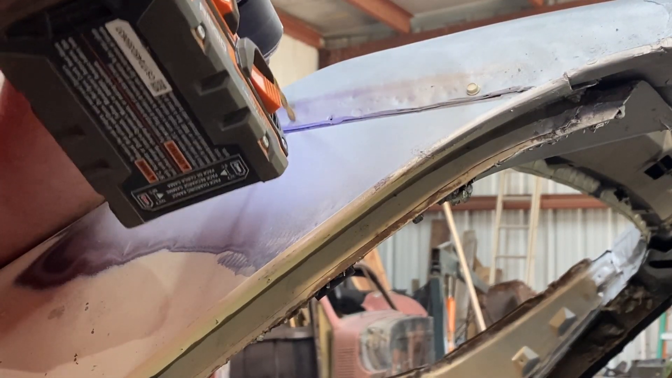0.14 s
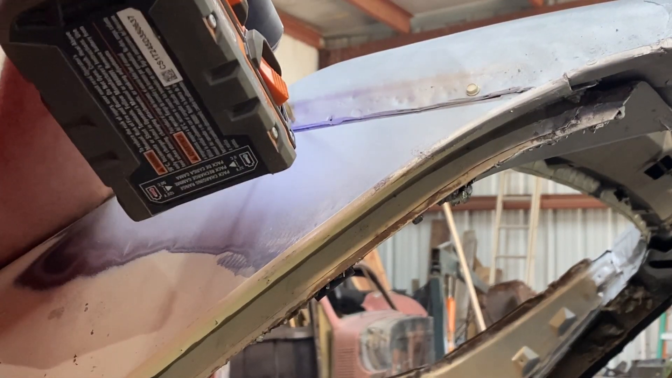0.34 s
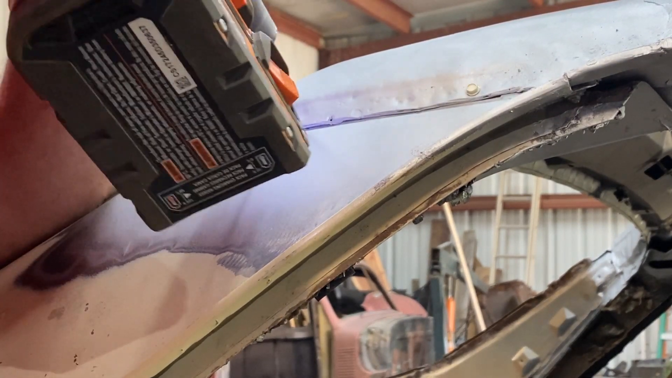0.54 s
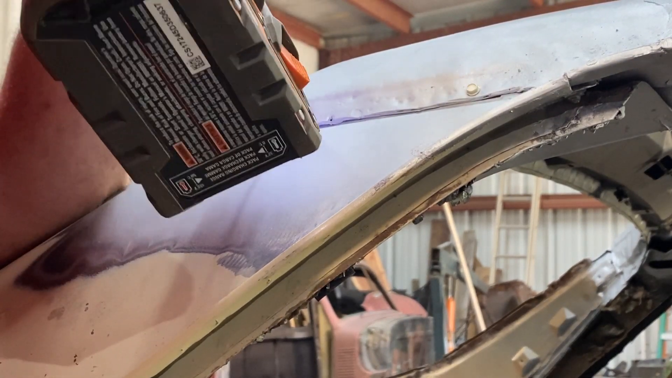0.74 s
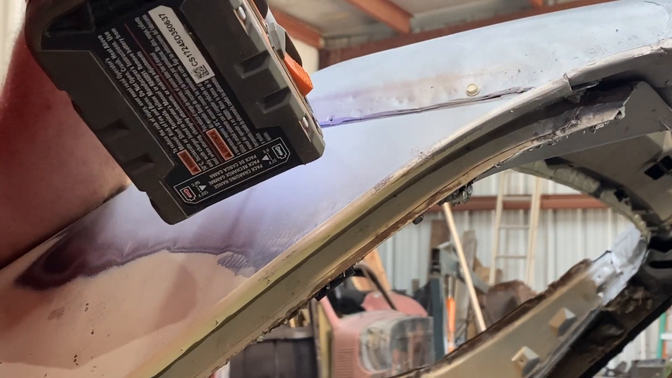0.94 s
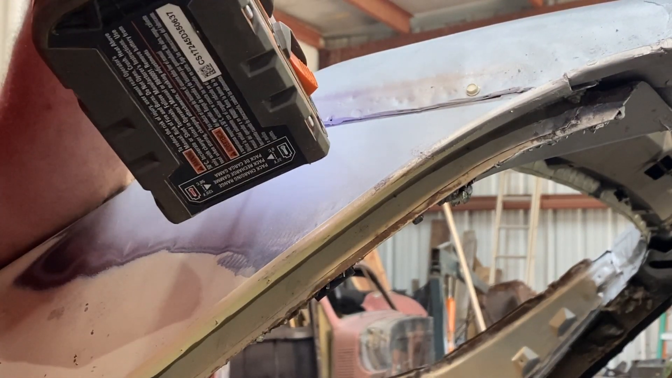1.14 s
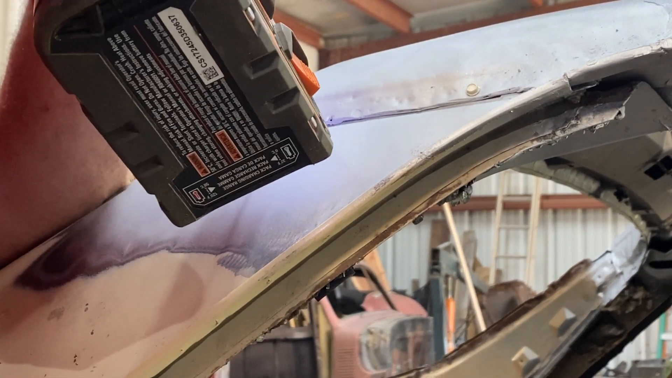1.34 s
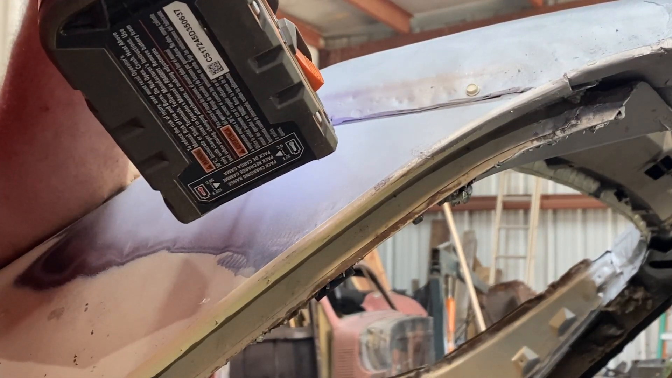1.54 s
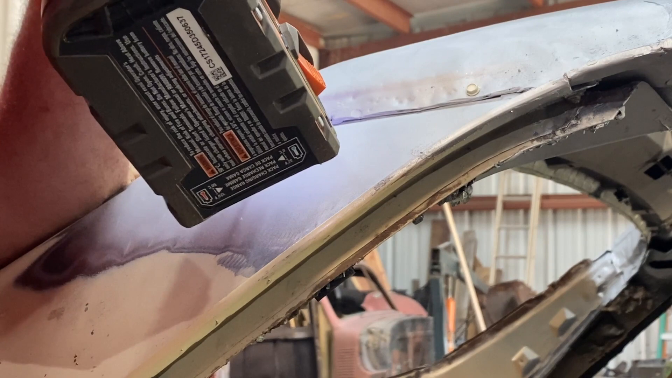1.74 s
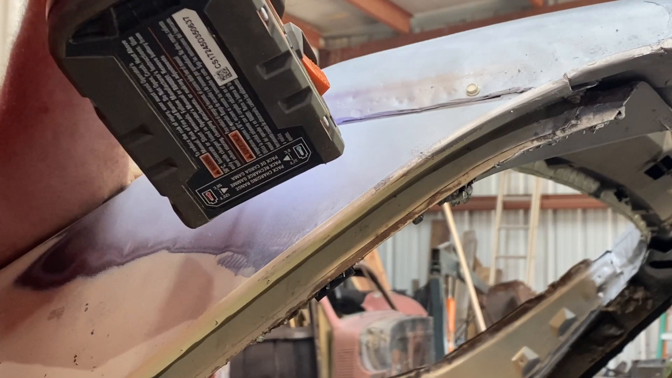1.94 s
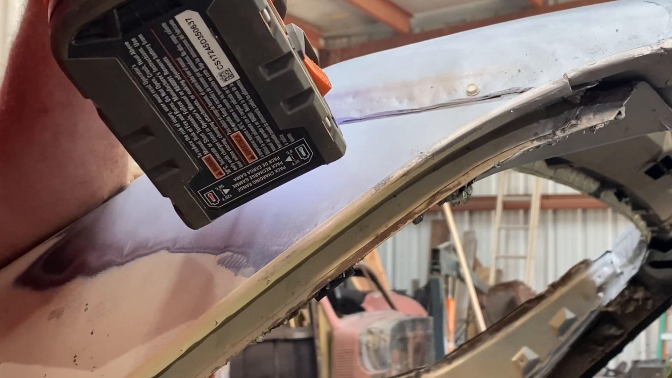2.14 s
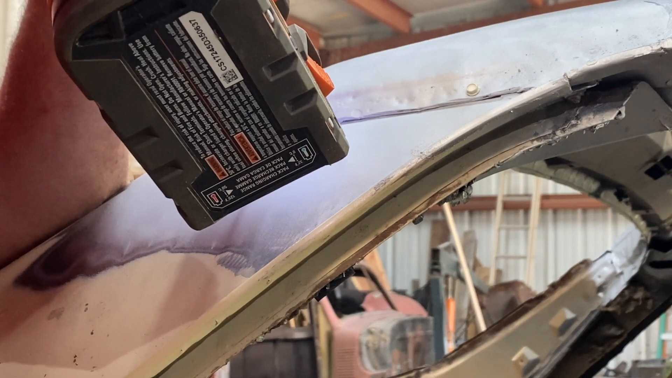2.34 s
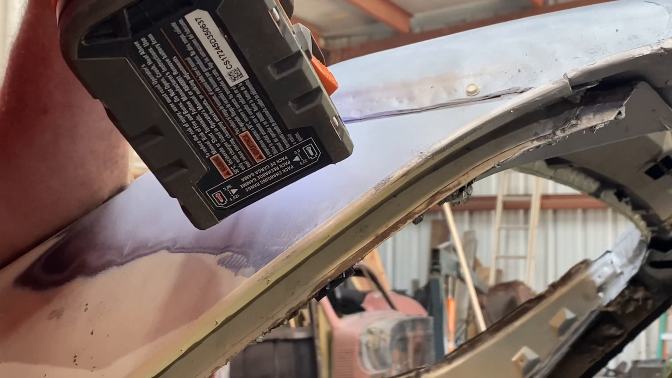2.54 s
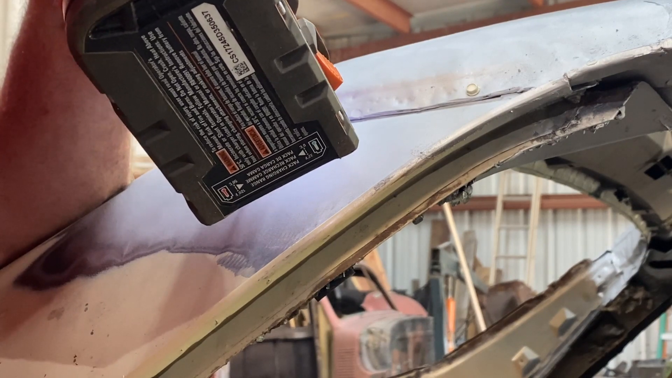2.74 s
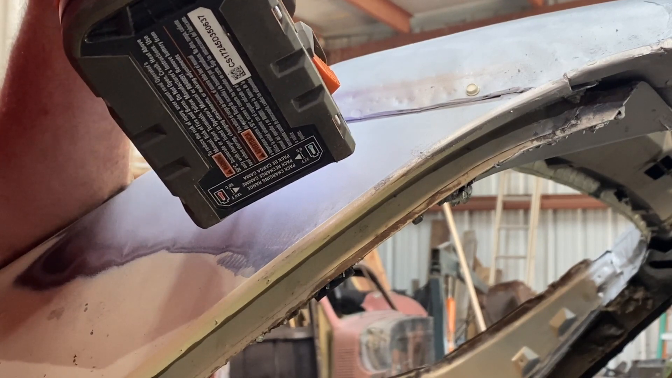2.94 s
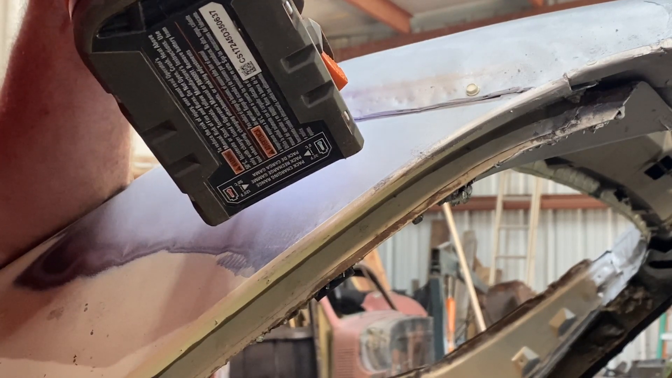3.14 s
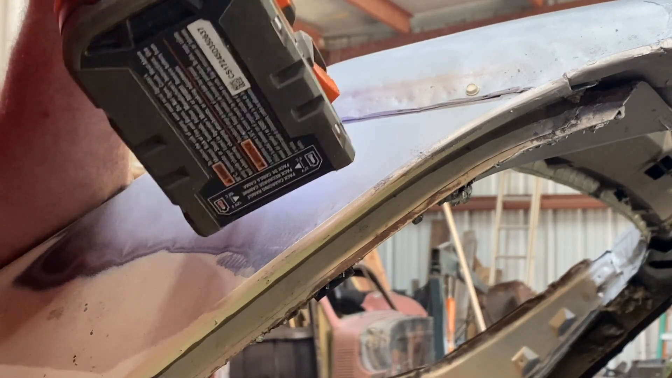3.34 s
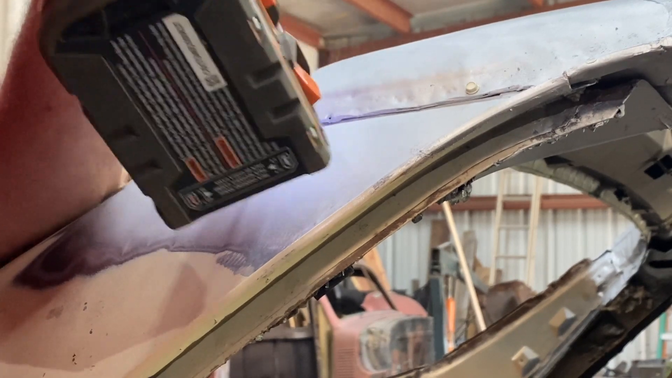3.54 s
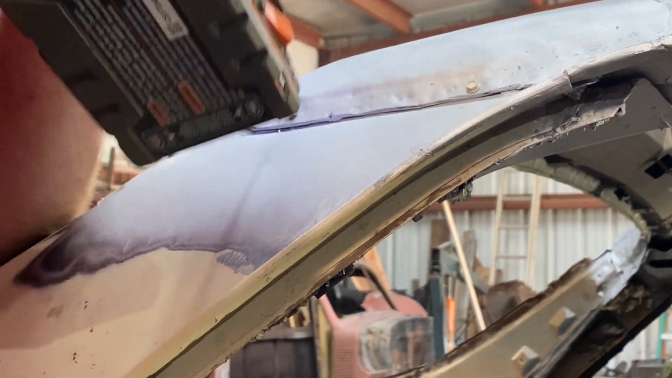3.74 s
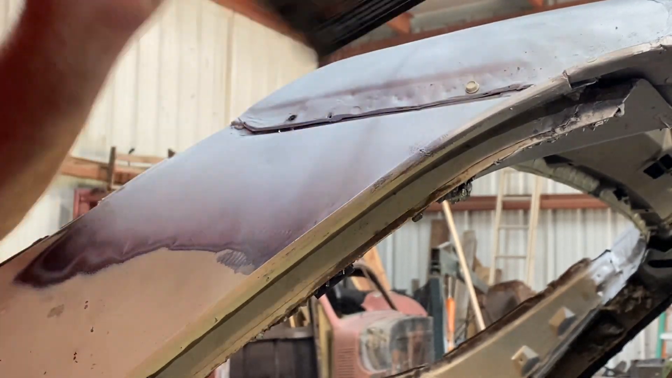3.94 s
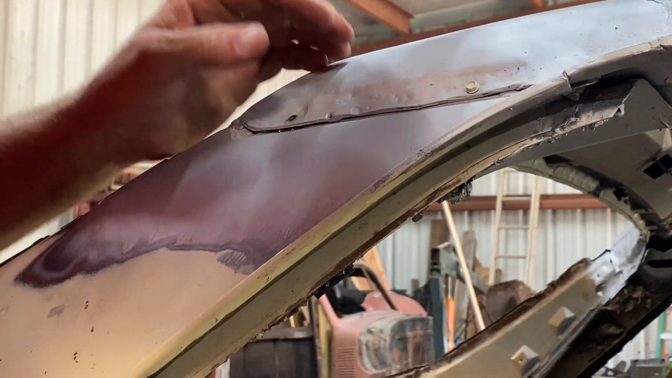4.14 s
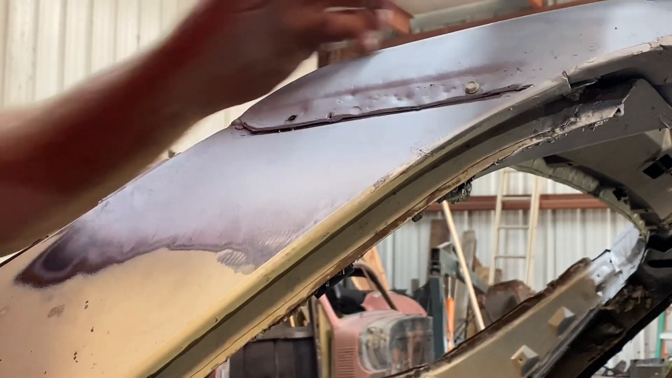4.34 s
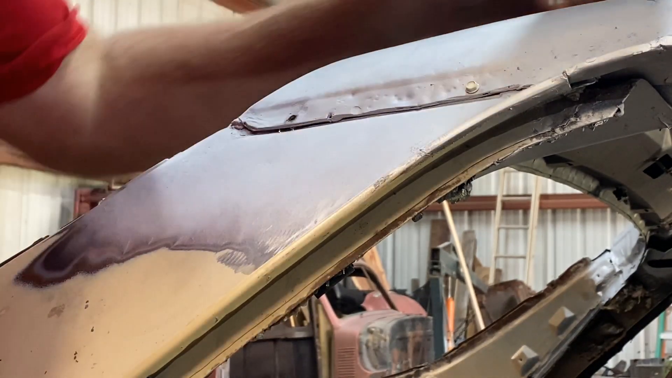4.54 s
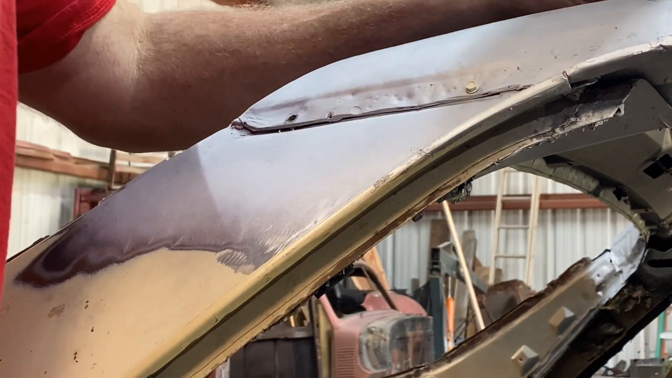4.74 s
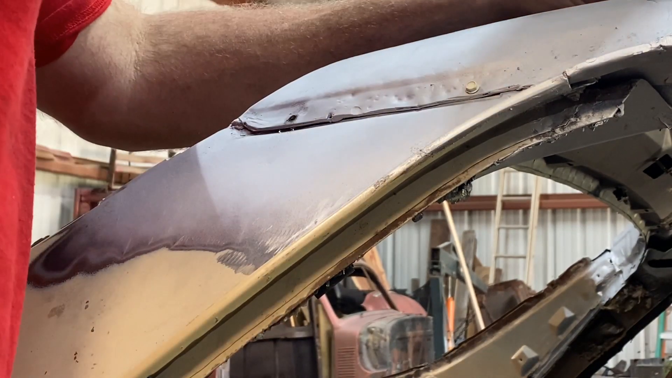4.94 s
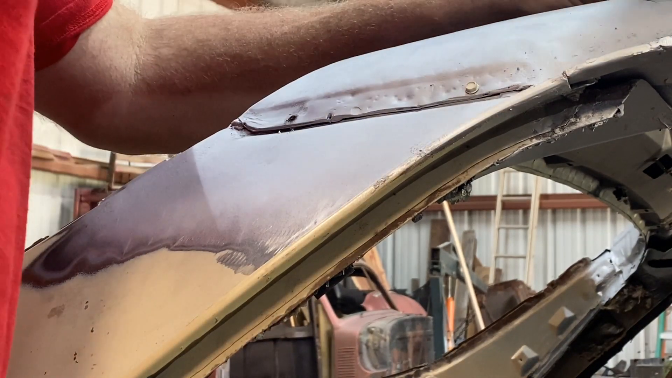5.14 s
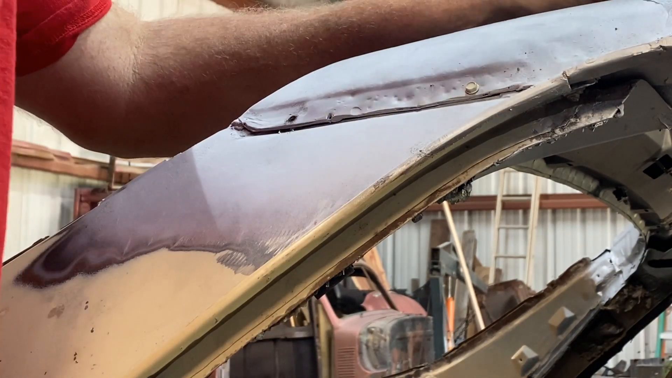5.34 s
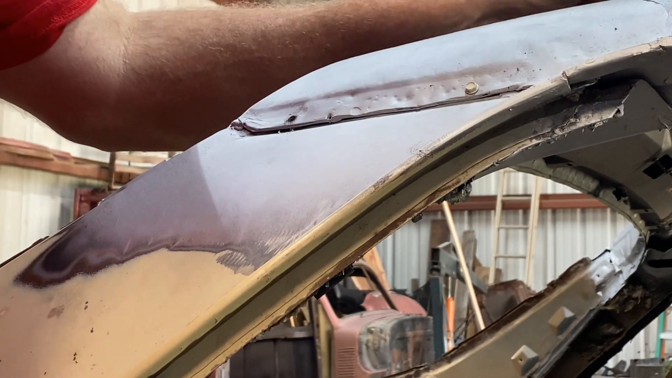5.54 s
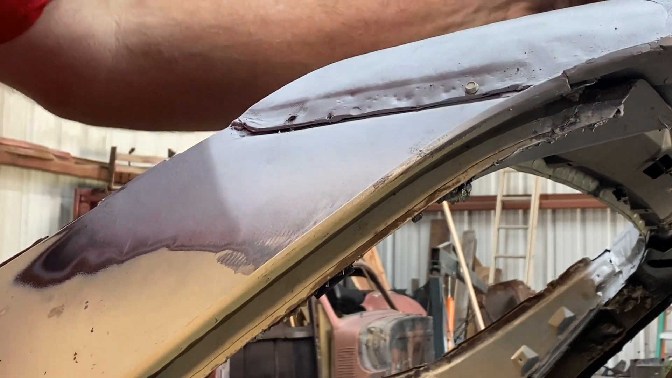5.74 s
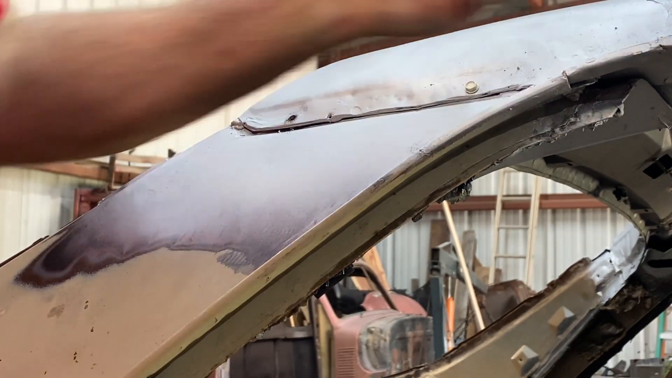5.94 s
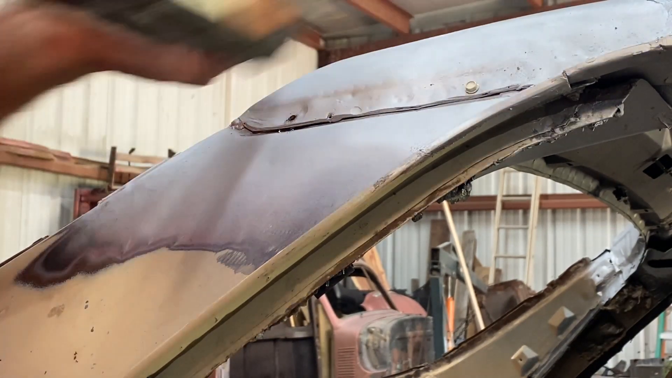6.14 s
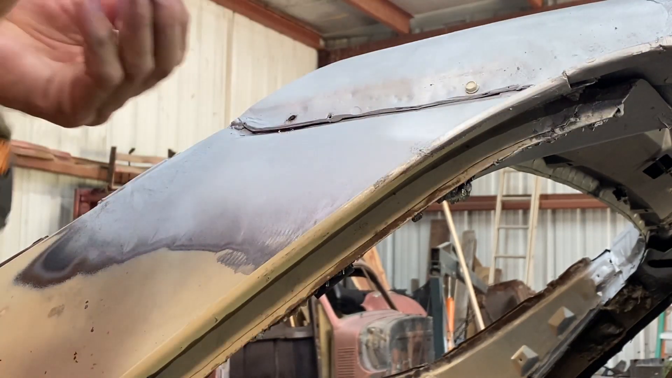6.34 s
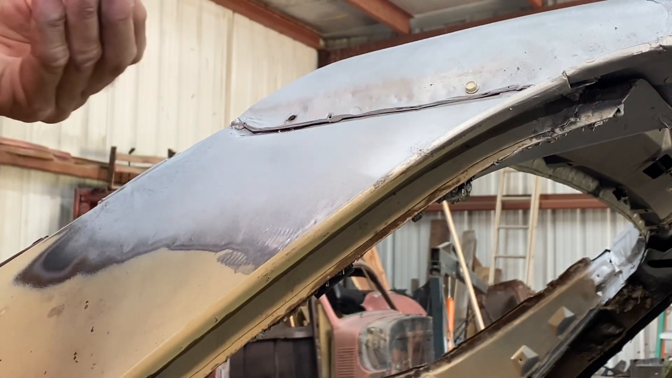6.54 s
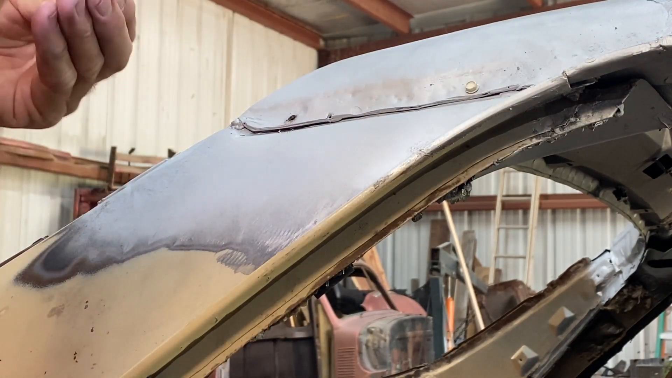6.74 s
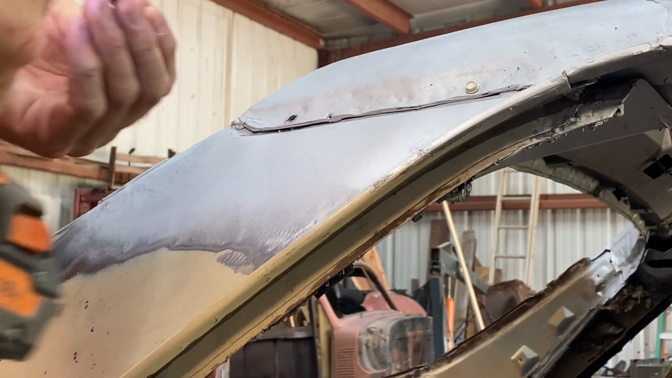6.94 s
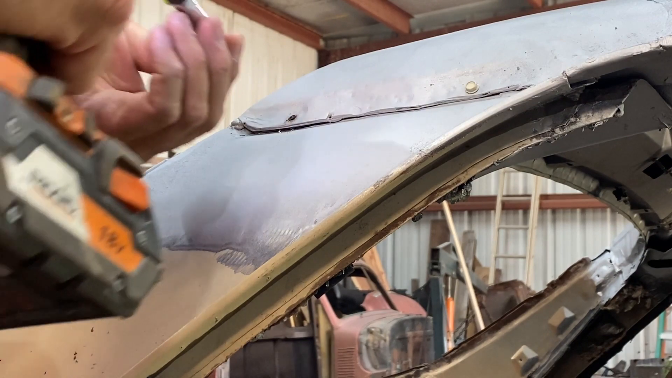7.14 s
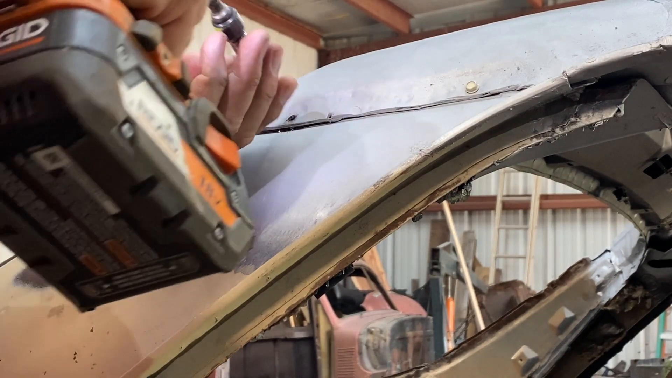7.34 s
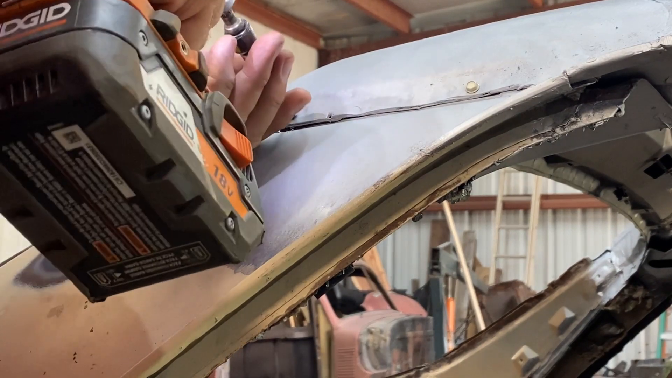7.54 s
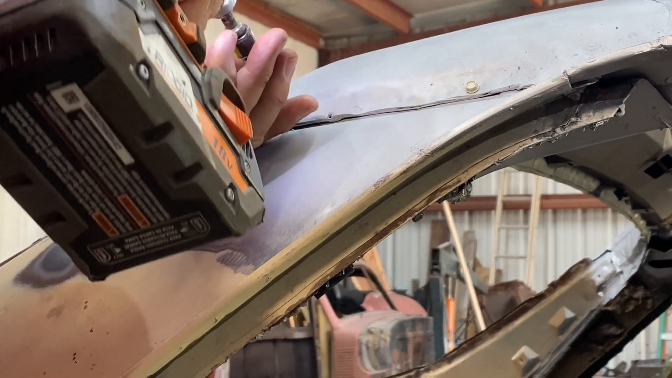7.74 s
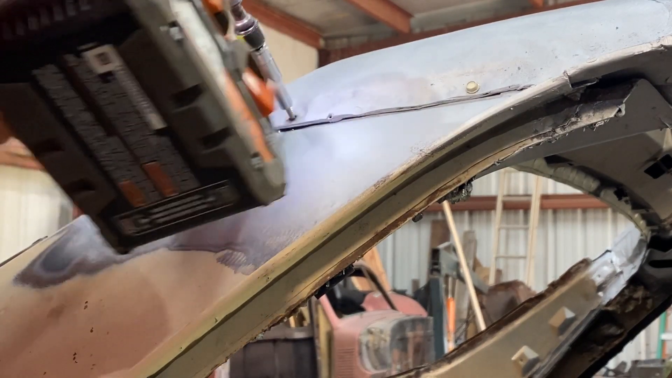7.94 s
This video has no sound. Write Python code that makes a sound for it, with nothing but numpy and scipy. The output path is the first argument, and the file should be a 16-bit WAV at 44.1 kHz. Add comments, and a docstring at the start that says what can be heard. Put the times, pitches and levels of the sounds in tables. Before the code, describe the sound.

Close, shrill drill whine sags under load and chirps to a stop; thin metal then clatters and slides, a screw clicks, and final knocks land.

```python
"""A cordless drill bores into a sheet-metal car panel close to the microphone, in a workshop.
Its magnetic whine sags under load over the noise of chips breaking at the bit; braking makes a loud falling chirp.
Then a hand rattles and slides the loose panel, it snaps into place and the drill is set on it again:
each blow rings damped modes of the sheet. A screw clicks, and air noise and machine hum lie behind."""
import sys
import numpy as np
from scipy import signal
from scipy.fft import rfft, irfft, next_fast_len
from scipy.io import wavfile

SR = 44100
rng = np.random.default_rng(int(sys.argv[2]) if len(sys.argv) > 2 else 0)


def to_wav(sig):
    """Store sig (one row per channel, or 1-D mono) as 16-bit WAV at the path in sys.argv[1].

    Samples outside -1..1 are clipped; the rate is SR.
    """
    pcm = np.clip(np.atleast_2d(sig), -1, 1) * 32767
    pcm = np.round(pcm).astype(np.int16)
    wavfile.write(sys.argv[1], SR, pcm.T)  # frames by channels


N = 356328
TIME = np.arange(N) / SR

# The motor, sagging as the hand leans on it. Each row: time in seconds, whine pitch in Hz, level in dB.
MOTOR = [(0.0, 3254, -11), (0.01, 3253, -9.5), (0.45, 3244, -13), (0.5, 3233, -17), (0.71, 3228, -10),
         (1.42, 3198, -11), (1.65, 3183, -16), (2.39, 3180, -17), (2.77, 3133, -16), (3.02, 3160, -18),
         (3.13, 3133, -15), (3.23, 3067, -19), (3.32, 3164, -17), (3.42, 3233, -24), (3.43, 3234, -38.5)]
WHINE_ORDER = 32  # whine cycles per turn of the rotor
# the trigger is released and the motor coasts; then the brake stops it
RELEASE_S, BRAKE_S, HALT_S = 3.44, 3.475, 3.58
BRAKE_HZ = 2982  # whine pitch as braking begins


def amp(db):
    """Amplitude ratio of a level: 20 dB is a factor of ten."""
    return 10 ** (np.asarray(db) / 20)


def unit(x):
    """Normalization to an rms value of 1."""
    return x / np.sqrt(np.mean(x ** 2) + 1e-20)


def read(points, hz):
    """Interpolation of a spectrum by straight lines on a log-frequency axis."""
    f, value = np.transpose(points)
    return np.interp(np.log(hz + 1), np.log(f + 1), value)


def curve(rows, axis=1):
    """Linear interpolation of one column of a table over the whole scene."""
    rows = np.array(rows)
    return np.interp(TIME, rows[:, 0], rows[:, axis])


def add(mix, s, sound):
    """Superposition of a sound on the mix, from a given second."""
    part = mix[round(s * SR):][:len(sound)]
    part += sound[:len(part)]


def colour(x, spectrum):
    """Linear filtering: the sound's spectrum is multiplied by a gain curve."""
    size = next_fast_len(len(x))
    gain = amp(read(spectrum, np.fft.rfftfreq(size, 1 / SR)))
    return irfft(rfft(x, size) * gain, size)[:len(x)]


def noise(spectrum):
    """Stationary random noise of rms 1 with a given spectrum."""
    return unit(colour(rng.standard_normal(N), spectrum))


def wander(rate_hz):
    """Low-passed random fluctuation of rms 1, up to about the given rate."""
    size, slow_rate = 8192, 1000
    f = np.fft.rfftfreq(size, 1 / slow_rate)
    slow = irfft(rfft(rng.standard_normal(size)) * np.exp(-(f / rate_hz) ** 2))
    return unit(np.interp(TIME, np.arange(size) / slow_rate, slow))


def tone(turns):
    """Sinusoid of rms 1 whose phase is counted in cycles, from a random start."""
    return np.sqrt(2) * np.sin(2 * np.pi * (turns + rng.random()))


def fuzzy(turns, width_hz):
    """Narrow-band noise: a tone gains width as its strength and phase drift."""
    angle = 2 * np.pi * turns
    return wander(width_hz) * np.cos(angle) + wander(width_hz) * np.sin(angle)


def resonate(x, hz, width_hz):
    """Response of a single damped resonance to a driving sound."""
    return signal.lfilter(*signal.iirpeak(hz, hz / width_hz, fs=SR), x)


def spells(rows, rise_s, fall_s, fade_db_per_s=0):
    """Amplitude envelope of a set of events: each rises, holds or fades, and is released."""
    total = 0
    for start, end, db in rows:
        gate = np.interp(TIME, [start - rise_s, start, end, end + fall_s], [0, 1, 1, 0])
        total = total + gate * amp(db - fade_db_per_s * np.clip(TIME - start, 0, end - start))
    return total


def shop(level_db=-44.5, drift_db=0.35, hum_db=-4.5, waver=0.15, whirr_db=-56):
    """Broadband air noise that drifts, a machine's wavering hum and a faint far narrow-band whirr."""
    # Air noise. Each row: frequency in Hz, relative level in dB per Hz.
    air_spectrum = [(28, -24), (55, 3), (100, 1.5), (150, 0.5), (280, -0.5), (550, -1.5), (800, -4),
                    (2100, -8), (3200, -13.5), (5000, -17.5), (8000, -26), (12500, -34), (15800, -38)]
    # Hum of a machine in the shop. Each row: frequency in Hz, relative level in dB.
    hum_tones = [(75.4, -65), (123.8, -47), (220.7, -57.5)]
    # Louder hum. Each row: start and end in seconds, gain added to the quiet hum in dB relative to it.
    hum_spells = [(2.55, 3.3, 5), (5.95, 6.4, 0), (6.85, 7.3, 0), (7.8, 8.08, 0)]
    air = amp(level_db + drift_db * wander(5.4)) * noise(air_spectrum)
    hum = 0
    for hz, db in hum_tones:
        hum = hum + amp(db) * tone(hz * TIME + .05 * wander(2.73)) * (1 + waver * wander(3.3))
    hum_gain = amp(hum_db) * (1 + spells(hum_spells, rise_s=.15, fall_s=0.1))
    whirr = amp(whirr_db) * fuzzy(1150 * TIME, 69.7)
    return air + hum * hum_gain + whirr


def screw(t60=0.011):
    """Impact of steel on steel: bright, rapidly decaying clicks of a screw in the hand."""
    # Each row: time in seconds, initial level in dB.
    ticks = [(5.925, -47), (6.632, -52.5), (6.788, -41)]
    out, t = np.zeros(N), np.arange(SR // 10) / SR
    for s, db in ticks:
        click = unit(resonate(rng.standard_normal(len(t)), 8400, 5000))
        add(out, s, amp(db - 60 * t / t60) * click)
    return out


def blow(spot_hz, boom_db, clank_db, click_db, modes_db=-4, rise_cycles=0.32, spot_db=6,
         spot_octaves=0.46, rest_db=-4, flex=0.053, crack_db=-3, crack_t60=0.0083):
    """Modal excitation: contact hardness and struck spot weight the modes; low ones build up slowly."""
    # Distinct modes of the panel. Each row: frequency in Hz, relative level in dB, t60 in seconds.
    panel_modes = [(124, 1.5, 0.17), (311.5, -3, 0.25), (397.6, -1.5, 0.25), (514, 1, 0.15), (602, 1, 0.19),
                   (690, -3, 0.19), (1136, -3, 0.096), (1417, -1.5, 0.088), (1507, -9, 0.07)]
    # Its countless smaller modes. Each row: band centre in Hz, relative level in dB, t60 in seconds.
    sheet_bands = [(139, -2, 0.32), (331, 0, 0.27), (688, -4.5, 0.16), (1256, 0, 0.15), (2900, -4.5, 0.13),
                   (5600, -1.5, 0.051), (8600, -10, 0.04), (13000, -32, .03)]
    t = np.arange(SR // 2) / SR
    contact = [(140, boom_db), (280, rest_db), (750, rest_db),
               (1100, clank_db), (2200, clank_db), (4500, click_db)]

    def envelope(hz, db, t60):
        """Exponential decay after a build-up that is shorter for higher modes."""
        favoured_db = spot_db * np.exp(-(np.log2(hz / spot_hz) / spot_octaves) ** 2)
        decay = amp(db + read(contact, hz) + favoured_db - 60 * t / t60)
        return decay * (1 - np.exp(-t * hz / rise_cycles))

    def hiss(hz):
        """Octave band of noise, standing for modes too dense to tell apart."""
        edges = [hz / np.sqrt(2), min(hz * np.sqrt(2), SR / 2 - 100)]
        band = signal.butter(4, edges, "band", fs=SR, output="sos")
        return unit(signal.sosfilt(band, rng.standard_normal(len(t))))

    out = hiss(7700) * amp(click_db + crack_db - 60 * t / crack_t60)
    for hz, db, t60 in sheet_bands:
        out += hiss(hz) * envelope(hz, db, t60)
    for hz, db, t60 in panel_modes:
        # the thin sheet flexes, so its modes shift from blow to blow
        shifted_hz = hz * (1 + flex * rng.uniform(-0.94, 1))
        out += tone(shifted_hz * t) * envelope(hz, db + modes_db, t60)
    return out


def knock(spot_hz, hard_db, boom_db=-13, boom_slope=-0.49, click_db=-4, click_slope=1.2,
          rebound_s=.017, rebound_db=-10, rebound_boom_db=15, rebound_soften_db=2):
    """Impact and elastic rebound: hard contact clanks and clicks, soft booms; the rebound is boomier."""
    boom, click = boom_db + boom_slope * hard_db, click_db + click_slope * hard_db
    out = blow(spot_hz, boom, hard_db, click)
    rebound = blow(spot_hz, boom + rebound_boom_db, hard_db, click - rebound_soften_db)
    add(out, rebound_s, amp(rebound_db) * rebound)
    return out


def rattle(taps_per_s=36, spread_db=3.0, spot_hz=450, spot_octaves=.4,
           boom_db=-3, clank_db=-1, click_db=2):
    """Repeated impacts: the loose edge taps lightly and hard, unevenly and on changing spots."""
    # Each row: start and end in seconds, mean level in dB.
    bouts = [(4.705, 4.78, -39.5), (4.85, 5.09, -40.5)]
    out = np.zeros(N)
    for start, end, db in bouts:
        for s in np.arange(start, end, 1 / taps_per_s):
            late, strength, spot = rng.uniform(-1, 1, 3)
            tap = blow(spot_hz * 2 ** (spot_octaves * spot), boom_db, clank_db, click_db)
            add(out, s + abs(late) / taps_per_s / 2, amp(db + spread_db * strength) * tap)
    return out


def panel(scrape_db=-2, grit_db=2.5):
    """Stick-slip friction and impact: the loose panel scrapes, rattles, snaps home and is bumped."""
    # Scrape noise. Each row: frequency in Hz, relative level in dB per Hz.
    scrape_spectrum = [(100, -16), (330, 2), (600, 3.5), (800, -7), (1050, -3), (3200, -17.5), (6500, -18),
                       (9800, -32), (11500, -44), (15600, -47)]
    # Pushes that slide the panel. Each row: start and end in seconds, relative starting level in dB.
    slides = [(4.706, 4.78, -31.5), (4.85, 5.09, -27), (5.555, 5.61, -34), (5.665, 5.685, -37)]
    # Hiss of the palm. Each row: frequency in Hz, relative level in dB per Hz.
    palm_spectrum = [(1500, -14), (5500, 0), (9000, 1), (12000, -12), (15800, -18)]
    # The palm brushes over the metal. Each row: start and end in seconds, starting level in dB.
    brushes = [(5.52, 5.62, -47.5)]
    # Blows. Each row: time in seconds, body level in dB, centre of the modes that
    # the struck spot favours in Hz, hardness of the contact in dB.
    knocks = [(4.699, -29, 520, -7), (4.716, -30, 450, 0), (4.843, -22.5, 600, -7.5),
              (4.899, -19.5, 650, -4), (4.94, -25, 430, -4.5), (4.98, -26, 556, -7.5),
              (5.023, -33.5, 390, 1), (5.06, -31.5, 397, -5), (5.558, -38, 550, -7), (5.663, -40, 470, -3),
              (5.7105, -24, 370, 8.5), (7.634, -34, 425, -11.5), (7.906, -36, 348, -16),
              (7.966, -18.5, 395, -9)]
    grit = rng.standard_normal(N) * amp(grit_db * wander(200))
    slips = unit(colour(grit, scrape_spectrum))
    push = spells(slides, rise_s=0.0085, fall_s=0.035, fade_db_per_s=42)
    out = slips * amp(scrape_db) * push
    out += noise(palm_spectrum) * spells(brushes, rise_s=0.028, fall_s=0.091, fade_db_per_s=22)
    for s, body_db, spot_hz, hard_db in knocks:
        add(out, s, amp(body_db) * knock(spot_hz, hard_db))
    return out + rattle()


def whine_hz(brake_shape=.61):
    """Rotor speed as whine pitch: it sags, coasts and is braked ever more steeply to a halt."""
    running = curve([row[:2] for row in MOTOR] + [(BRAKE_S, BRAKE_HZ)])
    return running * np.interp(TIME, [BRAKE_S, HALT_S], [1, 0]) ** brake_shape


def rotor_turns(flutter=0.00041):
    """Rotor angle in turns, the time integral of a speed that flutters a little."""
    speed = whine_hz() / WHINE_ORDER * (1 + flutter * wander(27.0))
    return np.cumsum(speed) / SR


def load(free_hz=3250, full_sag_hz=170):
    """Load from the speed drop: 0 at the free-running pitch, 1 at full sag."""
    return np.clip((free_hz - whine_hz()) / full_sag_hz, 0, 1)


def chattering(rise_s=0.028, fall_s=0.025):
    """Envelope of the bit's intermittent chatter, which comes and goes in bouts."""
    # Each row: start and end in seconds, relative level in dB.
    bouts = [(.04, .105, -20.5), (.22, .52, -22), (.88, 1.0, -31), (1.22, 1.6, -28.5), (1.9, 2.05, -26),
             (2.15, 2.47, -25.5), (2.7, 2.97, -25.5), (3.27, 3.46, -27.5)]
    return spells(bouts, rise_s, fall_s)


def cutting(turns, grind_db=-16.0, drift_db=.5, released_db=-5, rumble_db=-35.5, chatter_db=-2,
            idle_chatter_db=-38, grain_db=0.5, wobble=0.036, chuck_ratio=.06, burr_db=-36, clunk_db=-26):
    """Random fracture of chips, modulated by the chuck's turning; the panel rumbles and chatters."""
    # Grinding noise. Each row: frequency in Hz, relative level in dB per Hz.
    grind_spectrum = [(200, -37), (450, -4), (750, -3.5), (1120, -7), (1700, -2), (2500, 2.5), (3500, -1.5),
                      (5200, -0.5), (5900, -4), (7800, -9.5), (8600, -15.5), (11000, -22), (13000, -32),
                      (15800, -37)]
    # Panel rumble. Each row: frequency in Hz, relative level in dB per Hz.
    rumble_spectrum = [(40, -56), (90, -31), (130, -4.5), (190, -14), (260, -5.5), (350, 1.5), (500, -6),
                       (800, -21), (2000, -53)]
    # The bit catches and shakes the panel. Each row: start and end in seconds,
    # gain added to the steady rumble in dB relative to it.
    catches = [(3.2, 3.27, 4.5)]
    chatter_order = 14.45  # cycles per rotor turn
    level_db = grind_db + drift_db * wander(5.1) + released_db * (TIME > RELEASE_S - .02)
    surge = 1 + wobble * tone(chuck_ratio * turns)
    chips = rng.standard_normal(N) * amp(grain_db * wander(400))
    grind = unit(colour(chips, grind_spectrum)) * amp(level_db) * surge
    # the gear train clunks as its play is taken up in the stop
    clunk = spells([(3.541, HALT_S, clunk_db)], rise_s=0.0092, fall_s=.005, fade_db_per_s=200)
    shake = 1 + spells(catches, rise_s=.02, fall_s=0.14)
    rumble = noise(rumble_spectrum) * (amp(rumble_db) * shake + clunk)
    chatter_tone = tone(chatter_order * turns + 0.13 * wander(17))
    chatter_tone = chatter_tone + 0.51 * fuzzy(chatter_order * turns, 28)
    chatter = chatter_tone * np.maximum(chattering() * amp(chatter_db), amp(idle_chatter_db))
    burr = amp(burr_db) * fuzzy(9.55 * turns, 34.9)
    moving = np.interp(TIME, [HALT_S - .017, HALT_S + 0.004], [1, 0])
    return (grind + rumble + chatter + burr) * moving


def bearing_gains(low_db=-32, steal_db=-25, high_db=-35, high_load_db=13, skid_db=7.0, skid_s=0.26):
    """Load-dependent excitation: low tone yields to chatter, high grows; both louder until the bit bites."""
    skid = skid_db * np.interp(TIME, [skid_s, 2 * skid_s], [1, 0])
    low = amp(low_db + skid) / (1 + (chattering() / amp(steal_db)) ** 2)
    high = amp(high_db + skid + high_load_db * load() * (TIME < RELEASE_S))
    return low, high


def motor(turns, mesh_db=-25, shimmer=0.031, gear_shimmer=0.17, drone_db=-32.5,
          drone_fade_db_per_s=6, coast_db=-2, backlash=.1, gearbox_hz=7575, gearbox_width_hz=220):
    """Order-locked tones: magnetic whine while current flows, gears and bearings while the rotor turns."""
    # Gear tones: multiples of the rotor speed, and their levels in dB.
    gear_orders, gear_db = [6, 9, 12, 16, 64, 90.5, 128, 152], [-31.5, -38, -45, -33.5, -30, -45.5, -50, -68]
    # Tooth mesh: multiples of the rotor speed, and their relative levels in dB.
    mesh_orders, mesh_levels_db = [76, 80], [1.5, -11.5]
    # Bearing tones, low and high: multiples of the rotor speed.
    bearing_orders = [12.1, 40.83]
    driven = np.interp(TIME, [RELEASE_S - .02, RELEASE_S], [1, 0])
    turning = np.interp(TIME, [BRAKE_S, HALT_S], [1, 0])
    whine = tone(WHINE_ORDER * turns) * amp(curve(MOTOR, axis=2)) * (1 + shimmer * wander(31))
    gears = mesh = bearings = 0
    for order, db in zip(gear_orders, gear_db):
        gears = gears + amp(db) * tone(order * turns) * (1 + gear_shimmer * wander(13))
    for order, db in zip(mesh_orders, mesh_levels_db):
        tooth = tone(order * turns + backlash * wander(19))
        mesh = mesh + amp(db) * tooth * (1 + gear_shimmer * wander(22))
    # the tooth mesh is loudest where it meets a resonance of the gearbox
    mesh_hz = mesh_orders[0] / WHINE_ORDER * np.maximum(whine_hz(), BRAKE_HZ)
    detune = 2 * (mesh_hz - gearbox_hz) / gearbox_width_hz
    mesh_gain = np.maximum(1 / np.hypot(1, detune), amp(coast_db) * (1 - driven))
    # the balls slip a little, so their tones are less steady
    for gain, order in zip(bearing_gains(), bearing_orders):
        bearings = bearings + gain * tone(order * turns + 0.12 * wander(17))
    # a low drone that fades steadily, by 6 dB per second
    drone = amp(drone_db - drone_fade_db_per_s * TIME) * tone(4 * turns)
    return driven * whine + turning * (gears + mesh * amp(mesh_db) * mesh_gain + bearings + drone)


def brake(turns, brake_db=-7.5, fade_db_per_s=125, rough=0.31, ring_db=3, ring_hz=2885, ring_width_hz=7):
    """Swept excitation of resonances: braking-current tones fall and swell as they cross the housing's."""
    # Brake tones: multiples of the rotor speed, and their relative levels in dB.
    orders, levels_db = [16, 32, 64, 80, 128], [-1.5, -2.5, -1.5, -10.5, -24]
    # How strongly the drill's housing radiates. Each row: frequency in Hz, gain in dB.
    housing = [(900, -2.5), (1100, -15), (1330, 2), (1650, -3), (2300, 4), (2620, -6.5), (2880, 8.5),
               (3200, 6.5), (4200, -11), (5000, -9), (5800, -2.5), (7000, -11)]
    rotor_hz = np.gradient(turns) * SR
    tones = 0
    for order, db in zip(orders, levels_db):
        radiated = amp(db + read(housing, order * rotor_hz))
        tones = tones + radiated * tone(order * turns) * (1 + rough * wander(160.0))
    braking = [(BRAKE_S, HALT_S - .015, brake_db)]
    chirp = tones * spells(braking, rise_s=0.00072, fall_s=0.0099, fade_db_per_s=fade_db_per_s)
    # the rotor's steel goes on ringing after it has stopped
    return chirp + amp(ring_db) * resonate(chirp, ring_hz, ring_width_hz)


def room(x):
    """Reverberation: sparse reflections of random sign, each band decaying at its own rate."""
    # Each row: frequency in Hz, t60 in seconds.
    decay_times = [(120, 1), (400, 1), (1200, 0.39), (3000, 1), (6000, 0.66), (12000, 0.32)]
    # about 3000 reflections per second, after the first 8 ms
    taps = rng.choice([-1., 1.], SR) * (rng.random(SR) < 3000 / SR) * (np.arange(SR) > .008 * SR)
    hz, t, z = signal.stft(taps, SR, nperseg=256)
    decay = amp(-60 * t / read(decay_times, hz)[:, None])
    tail = signal.istft(z * decay, SR, nperseg=256)[1]
    return signal.fftconvolve(x, tail / np.linalg.norm(tail))[:N]


def scene(drill_room_db=-26, panel_room_db=-12):
    """Superposition of direct sound, reverberation and background, alike in both channels."""
    turns = rotor_turns()
    drill = motor(turns) + brake(turns) + cutting(turns)
    handling = panel() + screw()
    reverberation = room(amp(drill_room_db) * drill + amp(panel_room_db) * handling)
    mono = drill + handling + reverberation + shop()
    return np.array([mono, mono])


def record(dry, lopsided=0.037):
    """Asymmetric saturation: peaks overload the microphone, one side sooner; then a band limit."""
    ceiling = 1 + lopsided * np.sign(dry)
    clipped = dry / (1 + (dry / ceiling) ** 16) ** (1 / 16)
    lowpass = signal.firwin(511, 15850, window=("kaiser", 9), fs=SR)
    return signal.oaconvolve(clipped, lowpass[None], "same")


dry = scene()
out = record(dry)
to_wav(out)
```